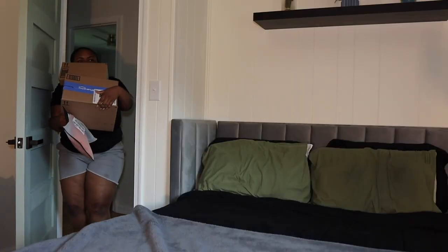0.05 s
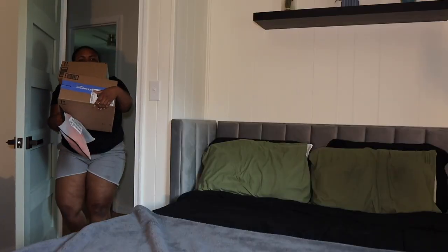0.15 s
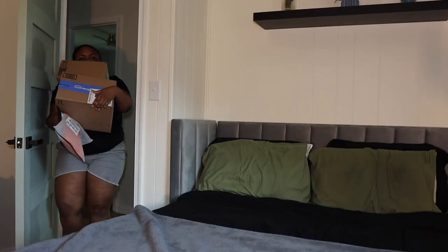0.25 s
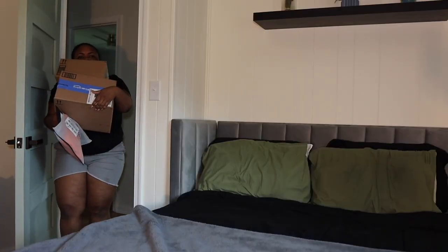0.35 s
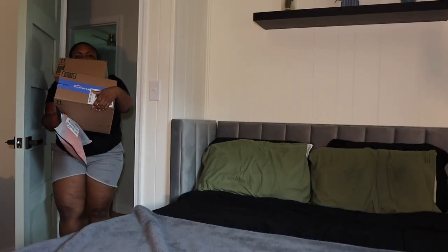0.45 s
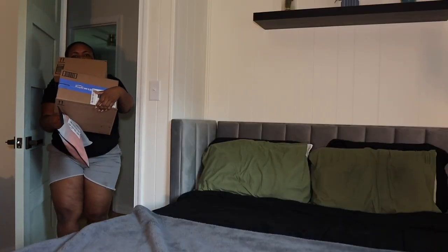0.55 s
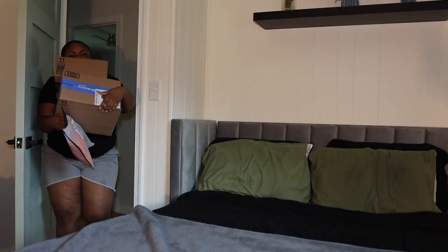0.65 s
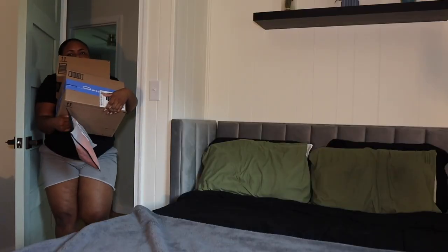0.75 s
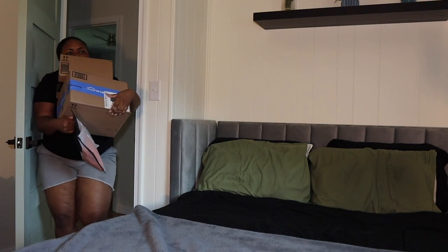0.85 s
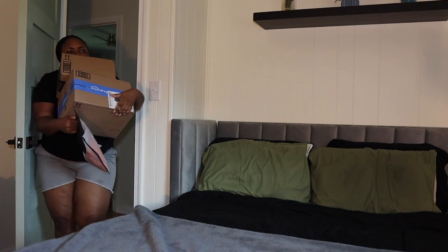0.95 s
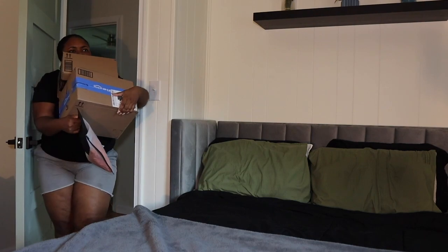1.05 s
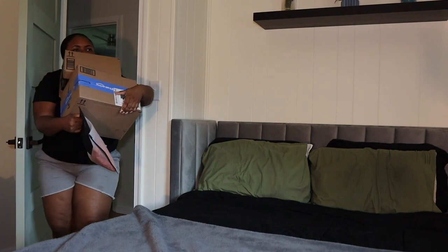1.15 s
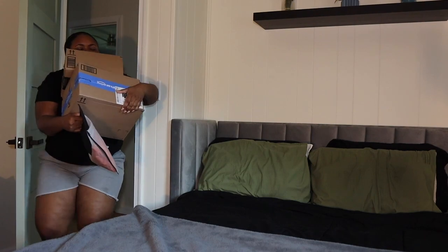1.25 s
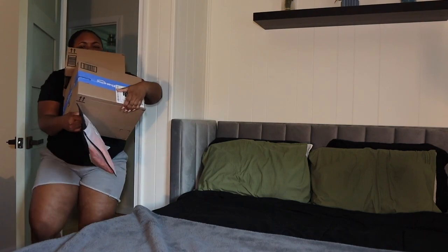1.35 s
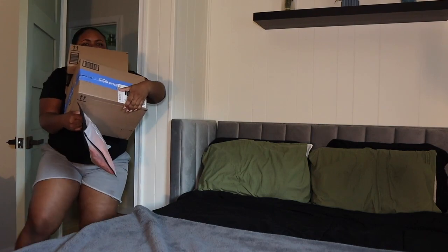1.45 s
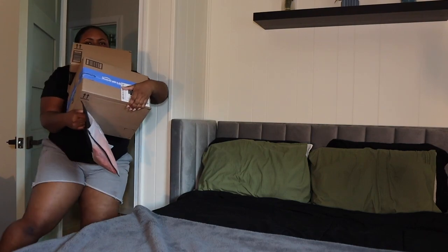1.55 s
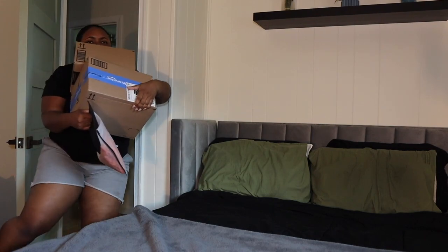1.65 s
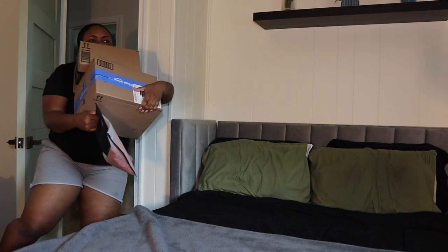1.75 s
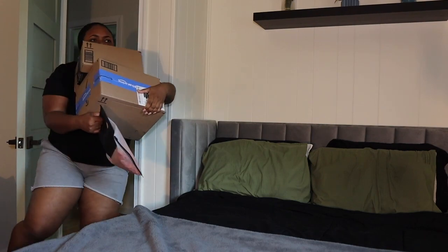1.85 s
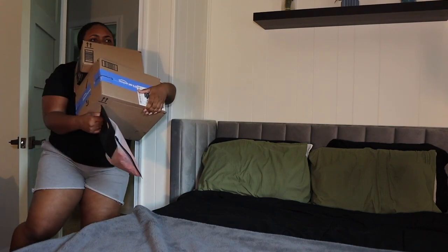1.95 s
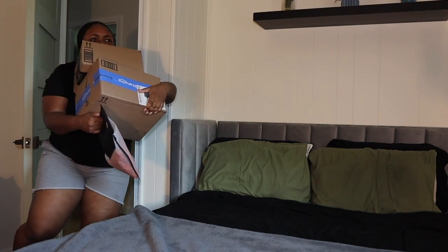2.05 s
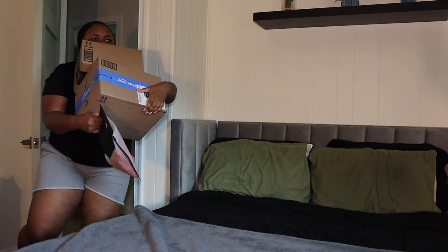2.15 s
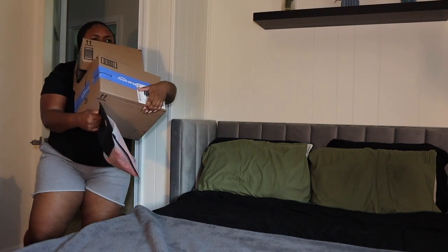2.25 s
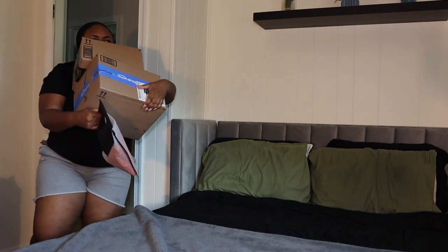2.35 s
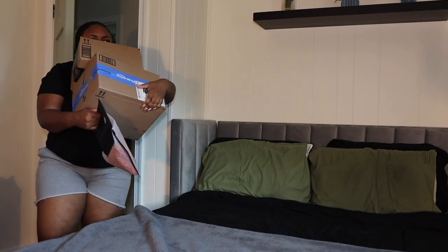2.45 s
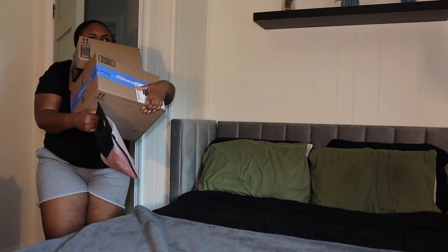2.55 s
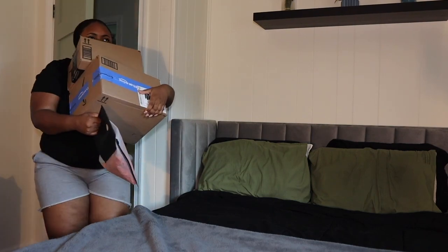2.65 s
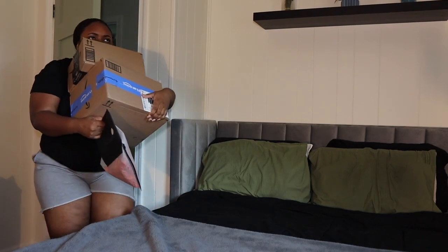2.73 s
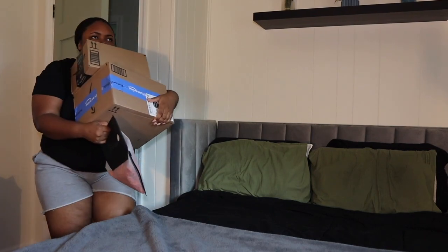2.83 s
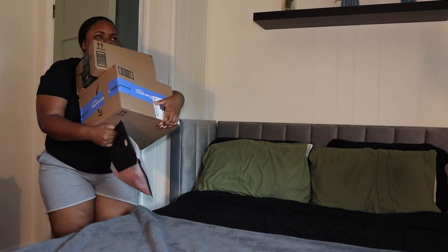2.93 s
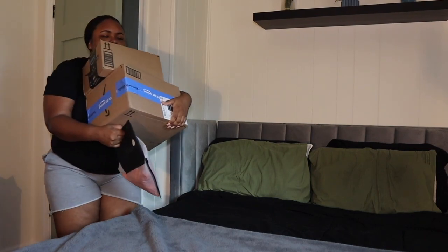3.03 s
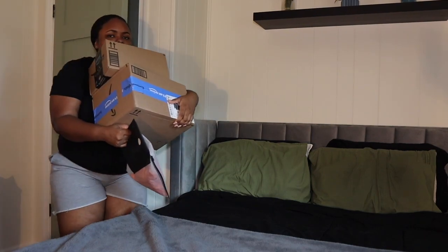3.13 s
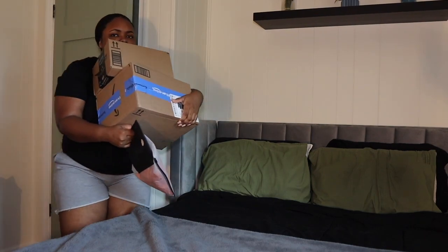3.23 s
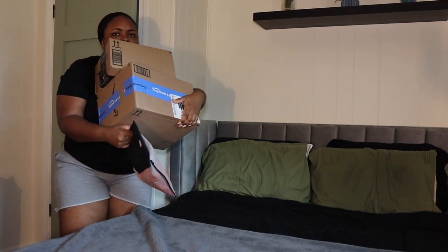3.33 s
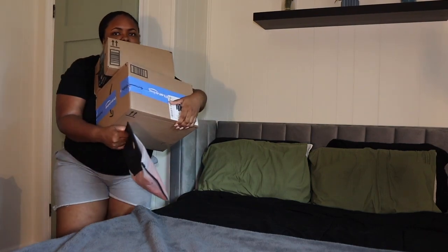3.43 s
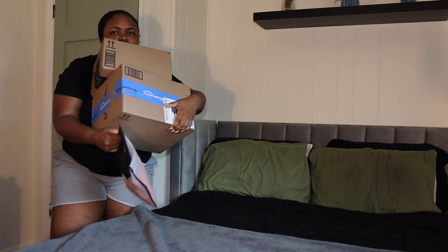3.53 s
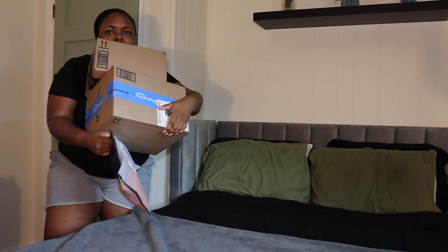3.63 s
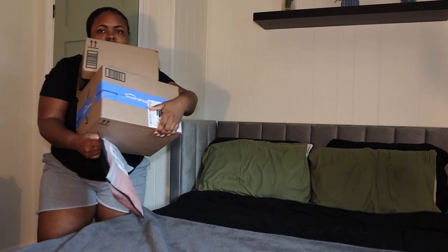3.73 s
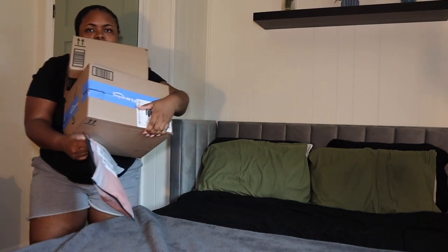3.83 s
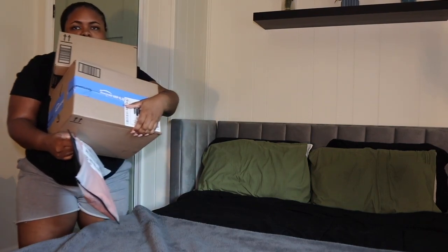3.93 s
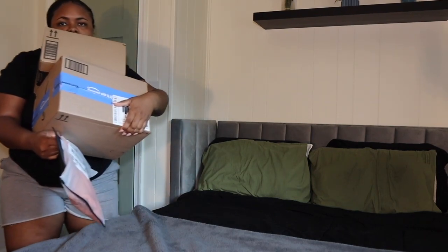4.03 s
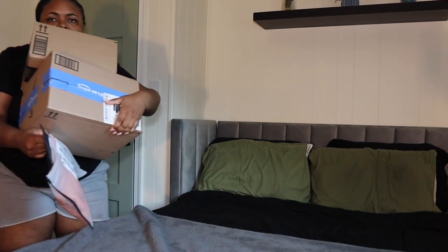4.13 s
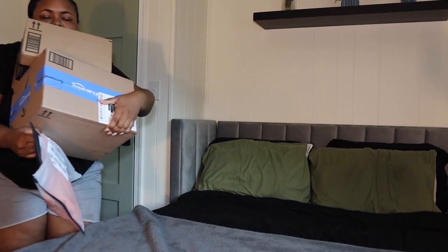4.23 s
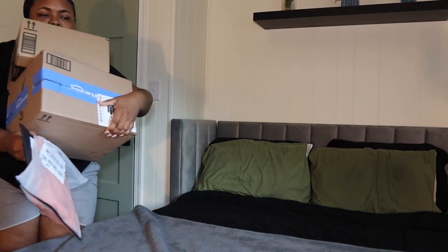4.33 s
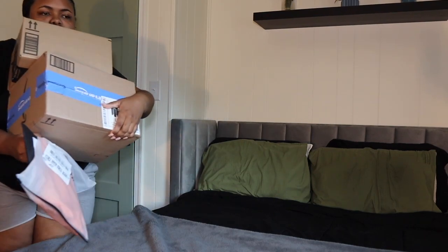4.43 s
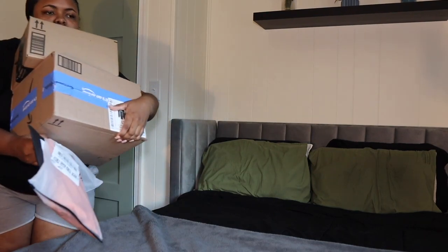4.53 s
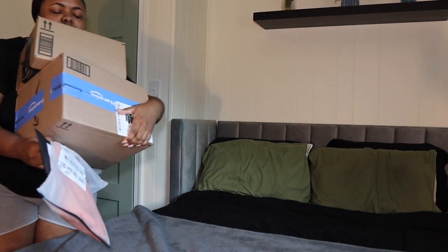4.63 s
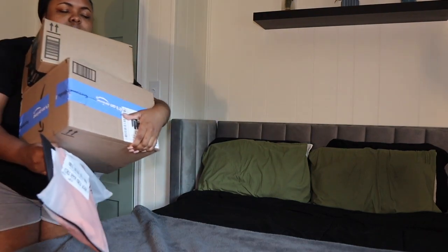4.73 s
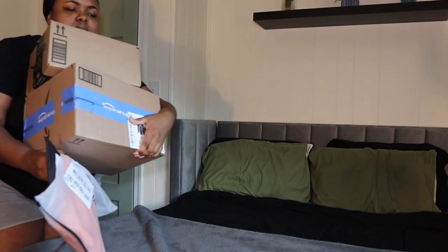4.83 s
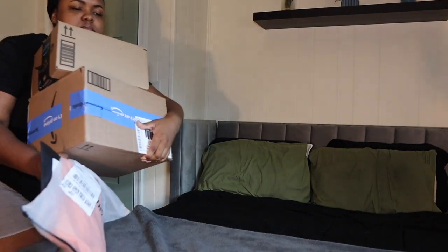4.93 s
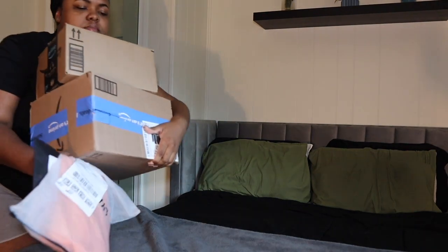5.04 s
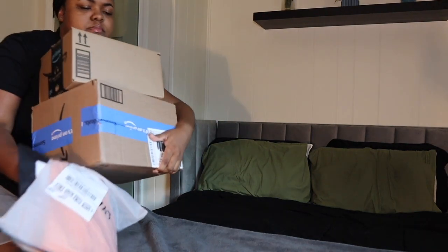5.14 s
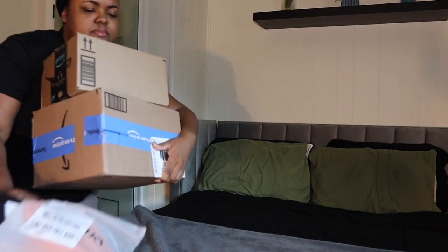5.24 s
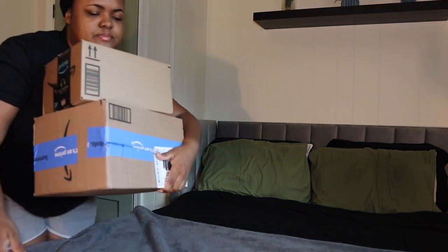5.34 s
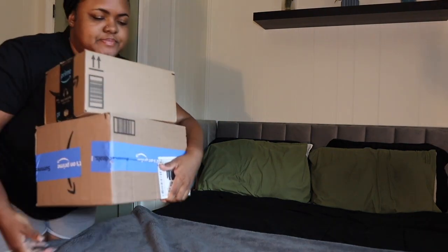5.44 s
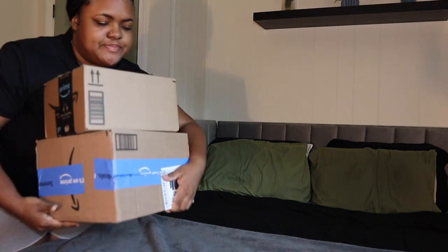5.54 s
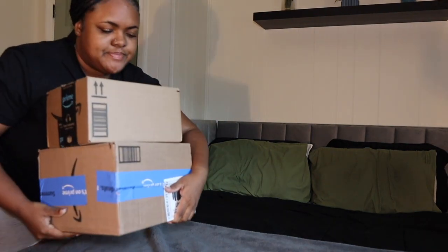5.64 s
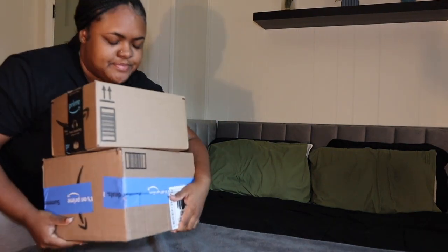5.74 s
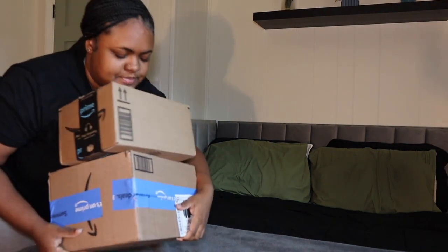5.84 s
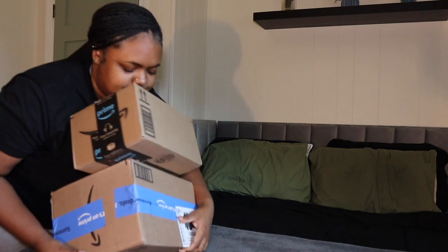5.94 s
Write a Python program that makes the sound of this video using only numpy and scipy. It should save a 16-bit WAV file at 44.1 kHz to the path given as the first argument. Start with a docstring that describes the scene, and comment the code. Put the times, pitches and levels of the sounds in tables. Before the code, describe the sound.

A small furnished bedroom with a short, soft echo, heard by a wide stereo microphone pair; low ventilation hiss and a faint wavering mains hum run throughout. From 0 to 0.65 s, carried cardboard boxes give light knocks, ticks and dry rubbing. Muffled, deep footsteps thump at about 1.15, 1.9 and 2.7 s, with small hollow box jolts and faint rustle between. At 3.45 s the wooden door knocks firmly into its frame, and at 3.67 s the latch clacks sharply with a low floor thump; these are the loudest sounds. Tiny short squeaks follow around 3.85-3.95 s. A quiet gap holds only faint rustling and small ticks at 4.3 and 4.5 s. Rubbing swells towards 5.1 s; the plastic mailer slaps down around 5.25-5.45 s with crisp cracks and crinkling. A hollow box thud lands at 5.6 s, then scraping continues into another knock at 5.95 s as it ends.

```python
"""Ventilation hiss and a wavering mains hum, made of coloured noise and a sine, lie under the whole scene.
Someone carries cardboard boxes and a plastic mailer into a bedroom: steps thump through the floor as ringing
low tones, and uneven bursts of tiny contacts ring the jolted boxes. The door is pushed shut and its latch
strikes twice, with short squeaks after it. Then the mailer drops on the bed and the boxes slide, as clumpy
rubbing noise with strokes that swell and fade. The room and the microphone pair spread the treble wide."""
import sys
import numpy as np
from scipy import signal
from scipy.fft import rfft, irfft, next_fast_len
from scipy.io import wavfile

SR = 44100
rng = np.random.default_rng(int(sys.argv[2]) if len(sys.argv) > 2 else 0)


def unload_audio(sound):
    """Save the sound as a 16-bit wav file, at the path given as the first command line argument."""
    columns = np.transpose(np.atleast_2d(sound))
    # keep every value between -1 and 1, then stretch to whole-number steps
    steps = np.round(np.clip(columns, -1, 1) * 32767)
    wavfile.write(sys.argv[1], SR, steps.astype(np.int16))


N = 263718   # length in samples

# Colour of the ventilation noise. Each row: pitch in Hz, relative level in dB per Hz.
AIR_COLOUR = [(12, -13), (22, 0), (60, -1.5), (88, -7.5), (125, 1), (165, -12), (280, -6), (480, -10.5),
              (880, -15), (1580, -19.5), (2330, -24.5), (6000, -33.5), (10200, -50), (11500, -51),
              (15500, -71)]
# Stereo width of the ventilation noise. Each row: pitch in Hz, side against mid in dB.
AIR_WIDTH = [(60, -51.5), (110, -13), (200, -4), (380, -3.5), (700, 1), (1290, 3), (2380, 6), (4400, 5),
             (8120, 8.5), (15000, 24.5)]
AIR_DB = -46.5   # typical level (rms) of the ventilation in mid
HUM_HZ, HUM_DB = 123.12, -48.5   # middle pitch and typical peak level of the hum

# How long the room rings. Each row: pitch in Hz, time to die by 60 dB in seconds.
ROOM_T60 = [(100, 0.262), (1000, 0.2133), (3000, 0.2164), (12000, 0.158)]
# Room tail against the direct sound: in mid in dB, in side in dB.
ROOM_TAIL_DB = (-4, 0)
# Width heard by the microphone pair. Each row: pitch in Hz, side against mid in dB.
PAIR_WIDTH = [(60, -16.5), (110, -34), (200, -28.5), (380, -18), (700, -6), (1290, -7), (2380, 1.5),
              (4400, 6), (8120, 3), (15000, 8)]
# Treble roll-off of the sources in the room. Each row: pitch in Hz, gain in dB.
TREBLE_ROLL_OFF = [(10500, 1.5), (11500, -5.5), (13000, -19.5), (15500, -19)]
CUTOFF_HZ = 15700   # nothing much is heard above this

# Heels and door loading the floor. Each row: start in seconds, level in dB, pitch struck most in Hz,
# share of the free ringing time (a plain factor).
THUMPS = [(.525, -34.5, 41, 1), (1.132, -22, 40, 0.345), (1.175, -30, 52, 0.6), (1.31, -34.5, 38, 0.3),
          (1.904, -30, 62, 0.76), (1.921, -31, 39.4, 0.92), (2.02, -36, 65, 1.25),
          (2.677, -27.5, 31.7, 0.77), (3.461, -35.5, 48.6, 2.3), (3.73, -24.5, 40.2, 1.37),
          (3.735, -25, 78, 0.966), (5.0, -44, 40, 0.85), (5.58, -32.5, 54.3, 0.51)]
# Ringing of floor and room. Each row: pitch in Hz, level in dB, free time to die by 60 dB in seconds.
FLOOR_MODES = [(23.95, -10.5, 0.41), (39.96, 0, 0.487), (56.5, -2, 0.4), (66.34, 0.5, 0.52),
               (102.6, 0.5, 0.537)]
# Low thuds of the door leaf. Each row: start in seconds, level in dB, pitch struck most in Hz,
# share of the free ringing time (a plain factor).
LEAF_THUDS = [(3.466, -20, 197.4, 0.893), (3.685, -29, 259, 1.2)]
# Ringing of the door leaf. Each row: pitch in Hz, level in dB, free time to die by 60 dB in seconds.
LEAF_MODES = [(161.7, -2, 0.176), (217.4, -0.5, 0.171), (245.7, -8, 0.417), (283.7, -10, 0.46)]
# Hollow thuds of the boxes. Each row: start in seconds, level in dB, pitch struck most in Hz,
# share of the free ringing time (a plain factor).
BOX_THUDS = [(.222, -36.5, 312, 1.82), (1.13, -35, 299, 1.11), (1.91, -28.5, 148.4, 2),
             (1.925, -31, 227, 1.14), (5.247, -25.5, 239, 1.2), (5.44, -34, 525, 0.92),
             (5.593, -20.5, 175.2, 0.47), (5.589, -24, 274, 0.935), (5.725, -32.5, 228, 1.3),
             (5.74, -31, 480, 1.4), (5.95, -33, 250, 1.9), (5.962, -30, 520, 0.89)]
# Air inside the boxes. Each row: pitch in Hz, level in dB, free time to die by 60 dB in seconds.
BOX_AIR_MODES = [(156.13, -1.5, 0.179), (226.77, -2, 0.146), (284.1, -2, 0.1034), (512.2, -1.5, .09),
                 (604.4, 1, 0.088)]
THUMP_RISE_S, THUD_RISE_S, LEAF_RISE_S = 0.0122, 0.00413, 0.00945
MODE_FOCUS_DB = 40.5   # loss of a mode one octave from the pitch struck most

# Short squeaks as the door settles. Each row: start in seconds, level in dB, pitch in Hz.
SQUEAKS = [(3.844, -42, 1400), (3.883, -45, 1450), (3.915, -39.5, 1370)]
SQUEAK_T60_S, SQUEAK_RISE_S = 0.022, 0.006
# Door leaf and latch meeting the frame. Each row: start in seconds, level in dB, leaf body against it
# in dB, latch against it in dB, time to die by 60 dB in seconds, pitch struck most in Hz.
DOOR_HITS = [(3.441, -36, 4, 4.5, 0.0212, 4300), (3.447, -36, 0, -25, 0.0088, 2500),
             (3.459, -20.5, -14.5, -3.5, 0.0355, 4360), (3.463, -12.5, 2, -11, 0.022, 2760),
             (3.471, -9, -1, -24.5, 0.023, 1440), (3.478, -15, 2.5, -30, 0.0944, 885),
             (3.662, -27.5, -31.5, -16, 0.126, 4000), (3.668, -13, -35, -4.5, 0.0515, 3300),
             (3.673, -8, -31, -11, 0.0345, 2180), (3.682, -12, -7.5, 8, 0.0204, 3000),
             (3.688, -13.5, -1, -12.5, 0.067, 1500), (3.722, -22.5, 9, -20, 0.05, 1400),
             (3.738, -27.5, 5.5, -7.5, 0.206, 1420)]
# Deep resonances of the door. Each row: pitch in Hz, least width in Hz, level in dB.
DOOR_BODY = [(163, 57, -2), (216.3, 94.4, 3), (320.4, 379, -2.5)]
# Panel resonances of the door. Each row: pitch in Hz, least width in Hz, level in dB.
DOOR_PANEL = [(540, 100, 3.5), (914, 220, 1), (1380, 297, 3), (2001, 428, 0), (2640, 570, -4),
              (4520, 940, -6)]
# Bright resonances of the latch. Each row: pitch in Hz, least width in Hz, level in dB.
LATCH = [(7000, 2100, -7), (9900, 1800, 0), (13600, 2900, -0.5)]
# Rise time; main contact over the burst; left over right.
DOOR_RISE_S, DOOR_SNAP_DB, DOOR_LEFT_DB = 0.003, 3.5, 1.5

# Steady rubbing of card and plastic against the body. Each row: time in seconds, level in dB,
# crackle against it in dB.
RUBBING = [(0.0, -50, -12), (.3, -59.5, -11.5), (.55, -53, -9), (.9, -54, -10.5), (1.25, -50, -8),
           (1.55, -60, -11.5), (1.8, -51.5, -5), (2.06, -65, -8.5), (2.3, -58.5, -6.5), (2.72, -54, -9.5),
           (2.9, -57, -10), (3.2, -57.5, -6.5), (3.4, -59.5, -12), (3.9, -50.5, -14.5), (4.18, -62, -12),
           (4.65, -55.5, -7), (4.95, -52, -5), (5.22, -46, -15), (5.68, -41.5, -7), (5.82, -40.5, -1.5),
           (5.98, -36, 2)]
RUB_BODY_DB = -2.0   # hollow body against the rubbing level
# Strokes of a box or the mailer sliding. Each row: time of the peak in seconds, level in dB, hollow body
# against it in dB, crackle against it in dB, seconds to swell by 20 dB, pitch rubbed most in Hz.
STROKES = [(2.699, -44.5, 2, -6, 0.0075, 1200), (4.321, -49, 0, -6.5, 0.09, 1800),
           (4.8, -46.5, 4, -6, 0.2062, 1510), (5.015, -40.5, -2, -6, 0.1912, 1300),
           (5.051, -38.5, 1.5, -4, 0.0955, 1300), (5.092, -32, -7.5, -5, 0.033, 1400),
           (5.115, -32, -5, -7, 0.0555, 1290), (5.285, -36.5, -8, -31.5, 0.02, 1820),
           (5.32, -38.5, -11.5, -10.5, 0.1044, 2200), (5.355, -33.5, -15, -11, 0.04, 1500),
           (5.41, -32, -6, -8, 0.0987, 1800), (5.462, -27, -6, -10, 0.0522, 1600),
           (5.505, -35.5, -1, -15, 0.0169, 2000), (5.589, -35, -8.5, -9, 0.055, 1210),
           (5.749, -32.5, -2.5, -7, 0.0383, 730), (5.876, -36.5, -24, -7, 0.34, 2210),
           (5.925, -33, -16.5, -4, 0.19, 1310), (5.972, -29.5, -6, -7, 0.0014, 700)]
STROKE_FADE_S = 0.079   # to fade by 20 dB
# Crinkle of the plastic mailer. Each row: pitch in Hz, least width in Hz, level in dB.
PLASTIC = [(4518, 1620, 2.5), (11000, 2200, 1)]

# Boxes jolted and bag slapping. Each row: start in seconds, level in dB, hollow body against it in dB,
# crackle against it in dB, time to die by 60 dB in seconds, pitch struck most in Hz.
KNOCKS = [(0.091, -40.5, 8.5, -14, 0.066, 1200), (0.217, -32, 2.5, -20, 0.0426, 800),
          (.24, -35.5, 0.5, -22, 0.081, 700), (0.526, -38, -19, -29.5, 0.032, 1800),
          (0.541, -25.5, -18.5, -16, 0.0308, 1290), (.564, -36, -14, -28, 0.03, 3300),
          (0.599, -30, 2.5, -31.5, 0.052, 700), (.632, -34, -8.5, -20, 0.044, 1300),
          (1.139, -38.5, -11.5, -16, 0.047, 2400), (1.379, -41, -17, -11.5, 0.061, 2600),
          (1.651, -41, -18, -20, 0.04, 2200), (1.674, -41, -19, -5, 0.068, 3500),
          (1.909, -27.5, -5.5, -10.5, 0.036, 2400), (1.921, -26.5, 9, -21, 0.0457, 800),
          (2.671, -24, -5, -17.5, 0.063, 1280), (2.988, -41.5, -14.5, -15.5, 0.093, 1820),
          (4.31, -40.5, -6, -19, 0.042, 1800), (4.505, -33.5, -16.5, -19, 0.03, 1400),
          (5.258, -27, -16, -30.5, 0.088, 1200), (5.396, -21, -17.5, -21.5, 0.0285, 1200),
          (5.434, -20.5, -0.5, -32, 0.0322, 700), (5.440, -16.5, -12.5, -14.5, 0.0434, 1000),
          (5.453, -20, -11.5, -17.5, 0.084, 1490), (5.478, -27, -3, -29.5, 0.039, 1000),
          (5.584, -19, 2.5, -14.5, 0.0336, 1200), (5.952, -21, -12, -6.5, 0.0285, 790)]
# Single cracks of stiff card and plastic. Each row: start in seconds, strength in dB,
# crackle against it in dB, pitch struck most in Hz.
CRACKS = [(.221, -18.5, -8.5, 3000), (0.5441, -16, -7, 3500), (.603, -19, -30, 900),
          (0.6341, -21, -7, 4000), (1.142, -21, -9.5, 2500), (1.382, -24, -12, 2500),
          (1.678, -26.5, -6, 4000), (2.562, -30.5, 7, 3500), (4.506, -22, -28.5, 1500),
          (5.259, -1, -38.5, 800), (5.306, -22, 3.5, 4000), (5.314, -22, 3, 4000), (5.334, -1.5, -19, 1500),
          (5.340, -6, -22.5, 1500), (5.346, -2, -24, 1300), (5.368, -18.5, 4.5, 4000),
          (5.398, -13, -20, 1400), (5.436, -3, -30.5, 1200), (5.443, -5.5, -6, 1500),
          (5.588, -6, -20, 1200)]
# Hollow resonances of the boxes. Each row: pitch in Hz, least width in Hz, level in dB.
BOX_BODY = [(148.4, 20, -6), (235.5, 27, -0.5), (305, 283, -4.5)]
# Panel resonances of the boxes. Each row: pitch in Hz, least width in Hz, level in dB.
BOX_PANEL = [(505.7, 287, 8.5), (1012.3, 307.6, 7), (1428, 569, 6), (2600, 1200, -0.5), (4039, 720, -2.5)]
# Bright crackle of the card. Each row: pitch in Hz, least width in Hz, level in dB.
BOX_CRACKLE = [(6170, 1500, 12), (11000, 1200, 7.5)]
# Rise time; main contact over the burst; left over right.
KNOCK_RISE_S, KNOCK_SNAP_DB, KNOCK_LEFT_DB = 0.006, 3.5, 2
PANEL_FOCUS_DB = 3.2   # loss one octave from the pitch struck most, before the total is evened out


def amp(db):
    """Turn a level in dB into a gain."""
    return 10 ** (np.asarray(db) / 20)


def rms_one(x):
    """Scale to an rms level of 1."""
    return x / np.sqrt(np.mean(x ** 2) + 1e-20)


def at_hz(points, hz):
    """Read a table between its rows, with pitch on a log scale."""
    table = np.array(points)
    return np.interp(np.log(hz), np.log(table[:, 0]), table[:, 1])


def colour(x, points):
    """Filter a sound by a smooth spectrum in dB."""
    length = x.shape[-1]
    size = next_fast_len(length + 8192)
    hz = np.maximum(np.arange(size // 2 + 1) * SR / size, 1)
    return irfft(rfft(x, size) * amp(at_hz(points, hz)), size)[..., :length]


def drift(rate_hz):
    """Slow random wander with spread 1: smoothed noise, made at every 40th sample."""
    r = np.exp(-80 * np.pi * rate_hz / SR)
    noise = rng.standard_normal(N // 40 + 2002)
    slow = signal.lfilter([1], [1, -2 * r, r * r], noise)[2000:]   # skip the filter's start
    return np.interp(np.arange(N) / 40, np.arange(len(slow)), rms_one(slow))


def band_limit(x, order, hz, kind="low"):
    """Keep the part of a sound below, above or between the given pitches."""
    return signal.sosfilt(signal.butter(order, hz, kind, fs=SR, output="sos"), x)


def swell(rise, t60):
    """Envelope that rises, then dies away; its top is 1."""
    t = np.arange(int(SR * (t60 + 5 * rise))) / SR
    shape = (1 - np.exp(-t / max(rise, 1e-4))) * amp(-60 * t / max(t60, 1e-3))
    return shape / shape.max()


def add(into, s, piece):
    """Mix a piece in at time s."""
    i = int(s * SR)
    into[..., i:i + piece.shape[-1]] += piece[..., :N - i]


def air():
    """Ventilation is coloured noise, a little to the left; the mains hum is a sine that wavers."""
    mid, side = colour(rng.standard_normal((2, N)), AIR_COLOUR)
    scale = amp(AIR_DB + 1.74 * drift(14.0)) / np.std(mid)
    phase = 2 * np.pi * np.cumsum(HUM_HZ + 3.284 * drift(7.57)) / SR
    hum = amp(HUM_DB + 0.96 * drift(34)) * np.sin(phase)
    return scale * mid + hum, scale * colour(side + 0.12 * mid, AIR_WIDTH)


def room_reply(direct_at, tail_db):
    """A direct sound plus random echoes that grow denser and die at a rate of their own in each octave."""
    t = np.arange(SR // 2) / SR
    density = np.minimum((400 + 90000 * t) / SR, 1)   # single echoes first, then ever more
    echoes = rng.standard_normal(len(t)) * (rng.random(len(t)) < density) / np.sqrt(density)
    tail = 0
    for low in 88 * 2. ** np.arange(8):
        octave = band_limit(echoes, 2, [low, min(2 * low, .45 * SR)], "band")
        tail = tail + octave * amp(-60 * t / at_hz(ROOM_T60, np.sqrt(2) * low))
    tail = tail * np.clip(t / 0.00091, 0, 1)   # the tail fades in over about a millisecond
    reply = amp(tail_db) * tail / np.sqrt(np.sum(tail ** 2))
    reply[direct_at] += 1
    return reply / np.sqrt(np.sum(reply ** 2))


def room(centre, lean):
    """Echoes surround the sources; a second, slightly late reply gives the microphone pair its width."""
    mid_reply = room_reply(0, ROOM_TAIL_DB[0])
    side_reply = room_reply(24, ROOM_TAIL_DB[1])
    mid, lean = signal.fftconvolve([centre, lean], [mid_reply], axes=1)[:, :N]
    spread = signal.fftconvolve(centre, side_reply)[:N]
    return mid, lean + colour(spread, PAIR_WIDTH)


def ring_tones(table):
    """A surface swings at one pitch and dies away."""
    out = np.zeros(N)
    for s, level_db, hz, t60, rise in table:
        shape = swell(rise, t60)
        t = np.arange(len(shape)) / SR
        add(out, s, -amp(level_db) * shape * np.sin(2 * np.pi * hz * t))
    return out


def struck(events, modes, rise):
    """Each blow rings all modes of a body, most of all those near the pitch it strikes."""
    tones = []
    for s, blow_db, centre_hz, share in events:
        for hz, mode_db, t60 in modes:
            loss_db = MODE_FOCUS_DB * np.log2(hz / centre_hz) ** 2
            tones.append((s, blow_db + mode_db - loss_db, hz, t60 * share, rise))
    return ring_tones(tones)


def low_thumps():
    """Steps and door ring the floor, blows ring the air in the boxes, and the door leaf rings too."""
    floor = struck(THUMPS, FLOOR_MODES, THUMP_RISE_S)
    box_air = struck(BOX_THUDS, BOX_AIR_MODES, THUD_RISE_S)
    leaf = struck(LEAF_THUDS, LEAF_MODES, LEAF_RISE_S)
    return floor + box_air + leaf


def door_squeaks():
    """Each squeak is one short tone, placed in the centre."""
    tones = [(s, level_db, hz, SQUEAK_T60_S, SQUEAK_RISE_S) for s, level_db, hz in SQUEAKS]
    return ring_tones(tones) * [[1], [0]]


def resonate(x, modes):
    """Broad resonances side by side, on one force or one each; white noise comes out at its own rms."""
    out, power = 0, 0
    forces = np.broadcast_to(x, (len(modes), N))
    for k, ((hz, width, level_db), force) in enumerate(zip(modes, forces)):
        r = np.exp(-np.pi * max(width, hz / 4) / SR)   # card and wood are heavily damped
        sign = (-1) ** k   # neighbours take opposite signs
        b = sign * amp(level_db) * (1 - r * r) / 2 * np.array([1, 0, -1])
        a = [1, -2 * r * np.cos(2 * np.pi * hz / SR), r * r]
        out = out + signal.lfilter(b, a, force + 1e-18)
        power += amp(2 * level_db) * (1 - r * r) / 2
    return out / np.sqrt(power)


def contacts(per_s, spread_db):
    """A dense train of tiny uneven slips, at an rms level of 1."""
    sizes = amp(spread_db * np.minimum(rng.exponential(1, N), 4)) * rng.choice([-1, 1], N)
    return rms_one(sizes * (rng.random(N) < per_s / SR))


def shares(body_db, bright_db, panel, centre_hz):
    """How a contact divides, in dB: hollow body, bright edge, then each panel resonance by distance in pitch."""
    hz, width, level_db = np.transpose(panel)
    lean_db = -PANEL_FOCUS_DB * np.log2(hz / centre_hz) ** 2
    weight = amp(2 * level_db) * np.maximum(width, hz / 4)
    total = np.average(amp(2 * lean_db), weights=weight)
    lean_db = lean_db - 10 * np.log10(total)   # the panels keep their total power
    return np.r_[body_db, bright_db, lean_db][:, None]


def ring_object(force, body, panel, bright, edge_hz):
    """Contact forces ring the hollow body, the bright edge and the panels."""
    edge = band_limit(resonate(force[1], bright), 2, edge_hz, "high")
    face = band_limit(resonate(force[2:], panel), 2, 6000)
    hollow = band_limit(resonate(force[0], body), 2, 500)
    return hollow + face + edge


def blows(table, body, panel, bright, rise, snap_db, left_db, edge_hz, crest_db):
    """Each blow is a snap in a short burst of contacts; returns the sound and its lean to the left."""
    force = np.zeros((2 + len(panel), N))
    grain = contacts(9000, 4.77)
    for s, level_db, body_db, bright_db, t60, centre_hz in table:
        part_db = level_db - crest_db + shares(body_db, bright_db, panel, centre_hz)
        add(force, s, amp(part_db) * swell(rise, t60))
        grain[int((s + rise / 2) * SR)] = -amp(snap_db)   # the main contact
    x = ring_object(force * grain, body, panel, bright, edge_hz)
    return np.array([x, x * np.tanh(left_db * np.log(10) / 40)])


def door_hits():
    """The leaf and latch strike the frame in short bursts."""
    return blows(DOOR_HITS, DOOR_BODY, DOOR_PANEL, LATCH, DOOR_RISE_S, DOOR_SNAP_DB, DOOR_LEFT_DB,
                 edge_hz=3600, crest_db=6.5)


def rustle():
    """Rubbing is a steady stream of contacts that comes in clumps; strokes swell out of it and fade."""
    t = np.arange(N) / SR
    s, level_db, bright_db = np.transpose(RUBBING)
    offsets_db = (RUB_BODY_DB, bright_db, *[0] * len(BOX_PANEL))
    power = amp(2 * np.array([np.interp(t, s, level_db + offset) for offset in offsets_db]))
    for s, peak_db, body_db, bright_db, swell_s, centre_hz in STROKES:
        stroke_db = peak_db - 20 * np.maximum((s - t) / swell_s, (t - s) / STROKE_FADE_S)
        stroke_power = amp(2 * np.maximum(stroke_db, -200))
        power += amp(2 * shares(body_db, bright_db, BOX_PANEL, centre_hz)) * stroke_power
    clumps = amp(1.2 * drift(25.0))
    force = np.sqrt(power) * clumps * contacts(6000, 2.9)
    x = ring_object(force, BOX_BODY, BOX_PANEL, PLASTIC, edge_hz=1500)
    x = band_limit(x, 8, 11300)   # keep the rubbing below 11.3 kHz
    return np.array([x, 0.11 * x])   # a little to the left


def cracks():
    """Each crack is one click into the panels and the bright edge of the boxes."""
    force = np.zeros((2 + len(BOX_PANEL), N))
    for s, level_db, bright_db, centre_hz in CRACKS:
        part_db = level_db + shares(0, bright_db, BOX_PANEL, centre_hz)
        force[1:, int(s * SR)] = amp(part_db)[1:, 0]   # the hollow body is left out
    x = ring_object(force, BOX_BODY, BOX_PANEL, BOX_CRACKLE, edge_hz=7300)
    return np.array([x, 0.404 * x])   # to the left


def box_knocks():
    """Jolts and slaps ring the boxes in short bursts of contacts."""
    return blows(KNOCKS, BOX_BODY, BOX_PANEL, BOX_CRACKLE, KNOCK_RISE_S, KNOCK_SNAP_DB, KNOCK_LEFT_DB,
                 edge_hz=5000, crest_db=5.0)


def scene():
    """Mix all sources as mid and side, then turn them into left and right."""
    sources = door_squeaks() + door_hits() + rustle() + cracks() + box_knocks()
    mid, side = room(*sources)
    air_mid, air_side = air()
    mid = colour(mid, TREBLE_ROLL_OFF) + air_mid + low_thumps()
    side = colour(side, TREBLE_ROLL_OFF) + air_side
    return np.array([mid + side, mid - side])


def record(dry):
    """Peaks clip at full scale, then the extreme treble is cut."""
    treble_cut = signal.cheby2(20, 70, CUTOFF_HZ, fs=SR, output="sos")
    return signal.sosfilt(treble_cut, np.clip(dry, -1, 1))


dry = scene()
out = record(dry)
unload_audio(out)
```